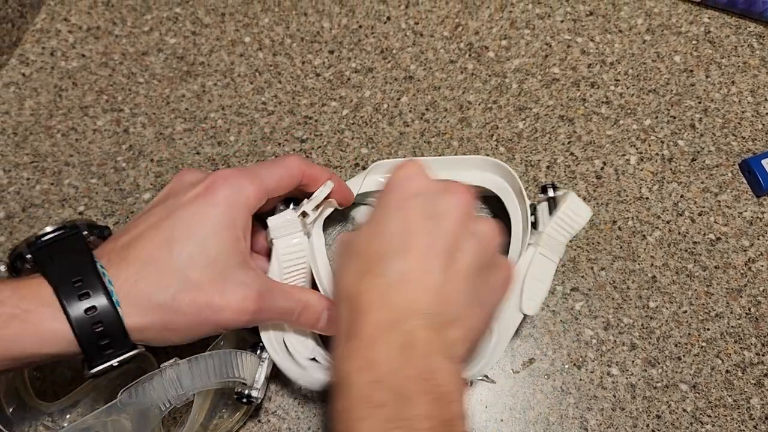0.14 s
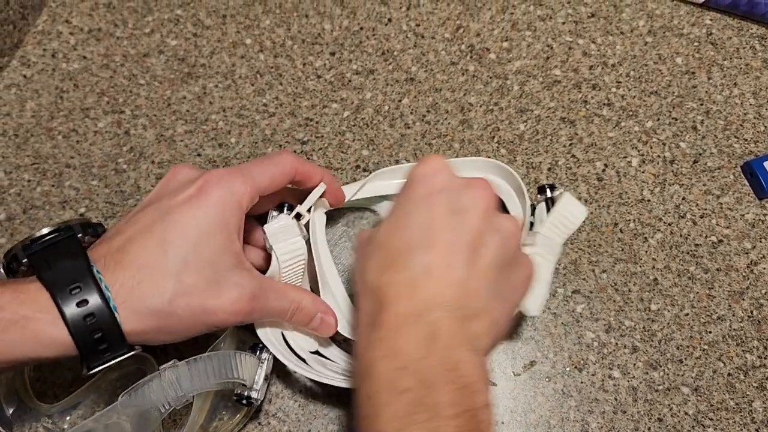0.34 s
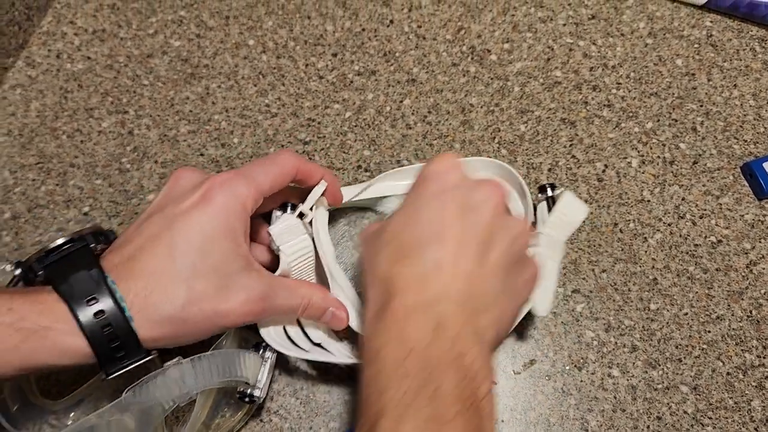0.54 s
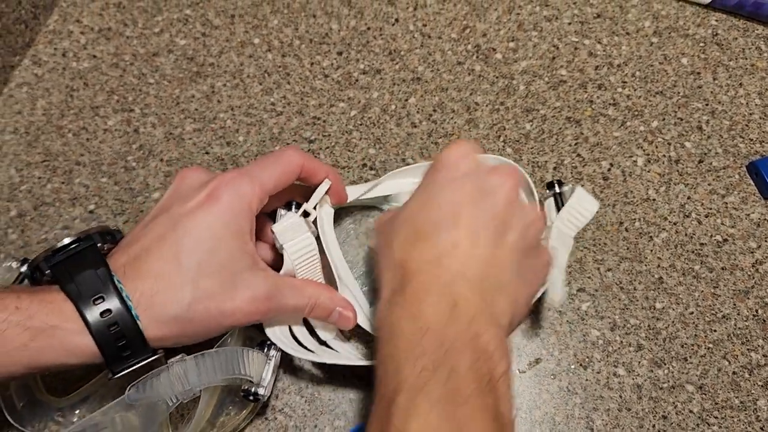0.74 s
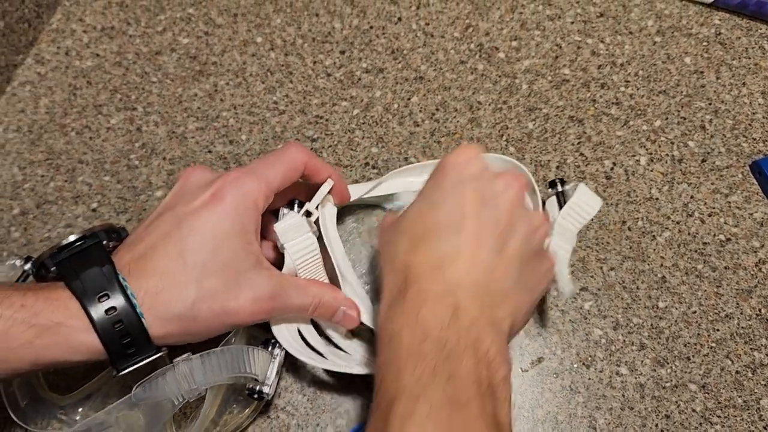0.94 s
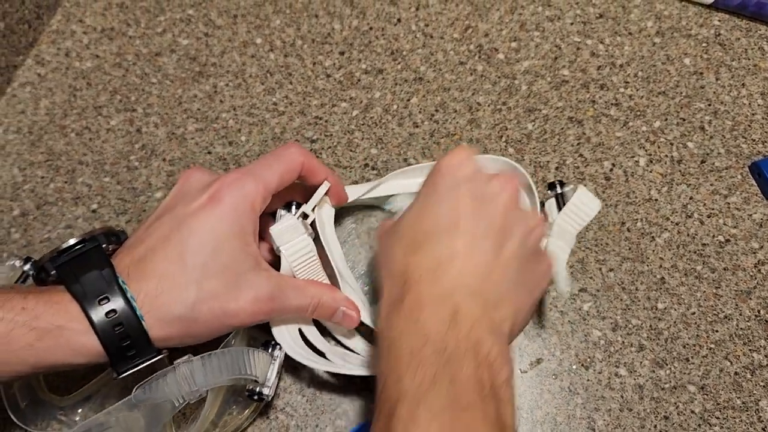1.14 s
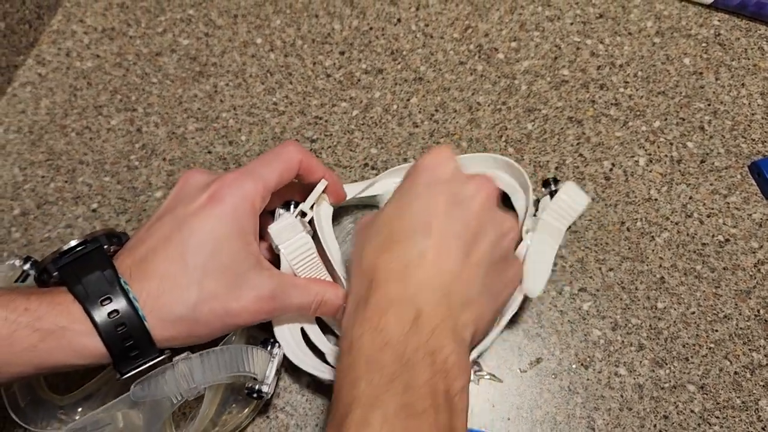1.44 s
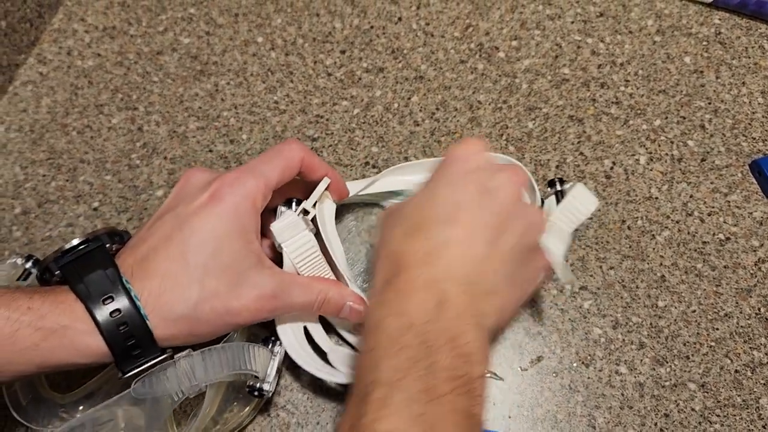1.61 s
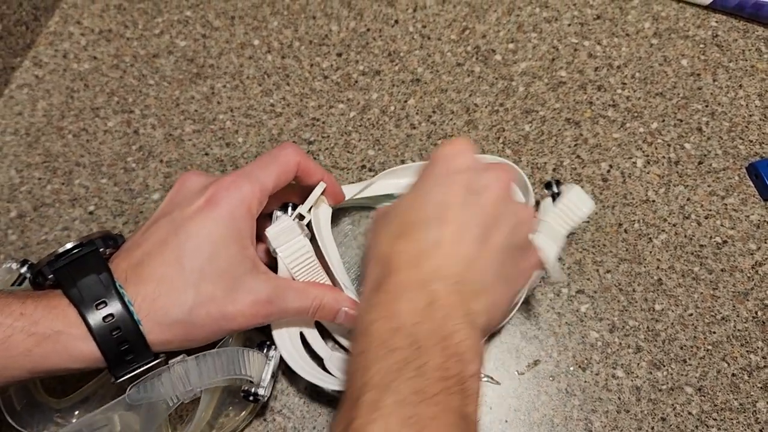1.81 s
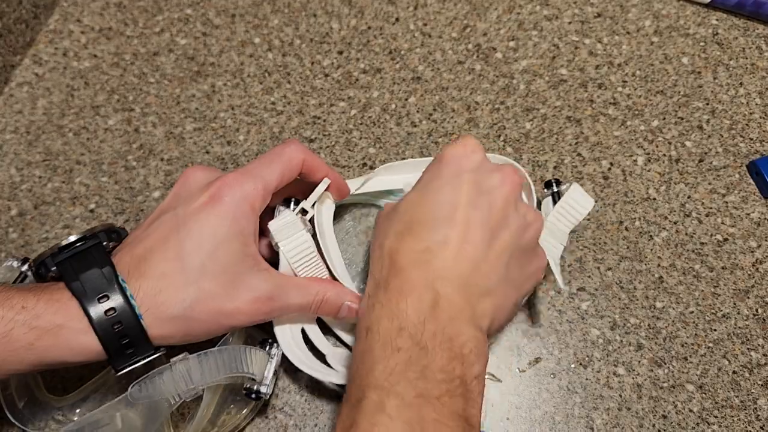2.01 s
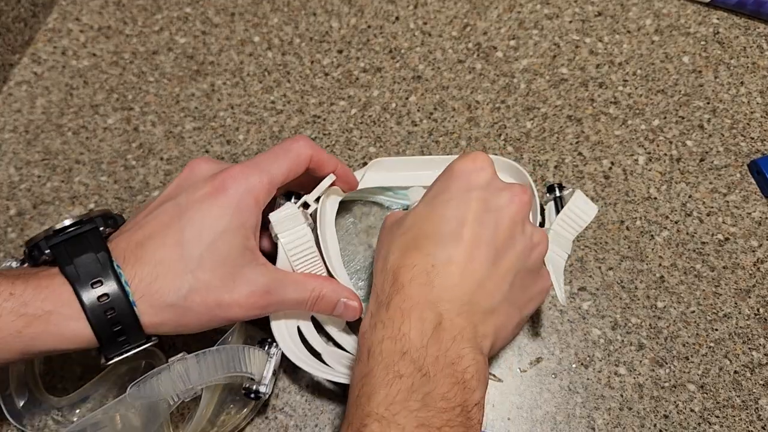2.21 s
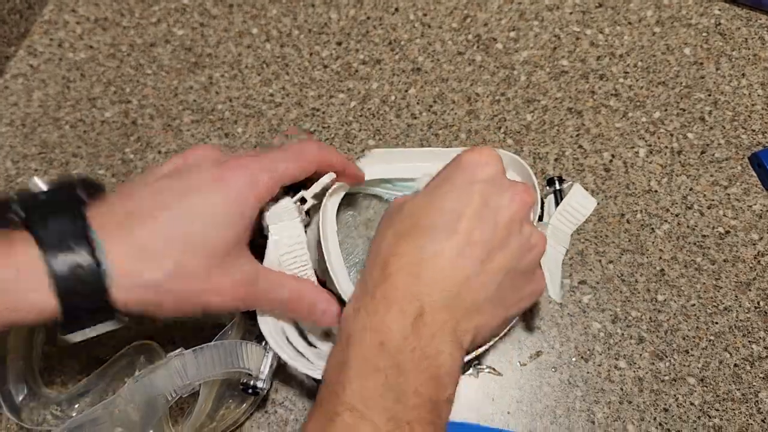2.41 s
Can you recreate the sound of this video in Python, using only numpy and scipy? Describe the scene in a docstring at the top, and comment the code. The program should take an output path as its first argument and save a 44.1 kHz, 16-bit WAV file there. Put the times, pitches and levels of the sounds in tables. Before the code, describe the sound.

Close in a small kitchen, fast scuffing finger strokes on a mask lens mix with dull counter bumps, low shudder, wet squelches and sticky ticks, fading after about two seconds to faint handling knocks.

```python
"""A kitchen counter in a small room: a fingertip scrubs gritty paste around the glass of a diving mask.
Random grains make the hiss and the scuffing strokes; short ringing hollows make the wet squelches.
Coloured noise bursts make paste snaps and frame clacks; decaying modes make the dull thumps and shudder.
A left and right microphone hear it, with sparse room reflections and a quiet background."""
import sys
import numpy as np
from scipy import signal
from scipy.fft import rfft, irfft
from scipy.io import wavfile
from scipy.ndimage import uniform_filter1d

SR = 44100
rng = np.random.default_rng(int(sys.argv[2]) if len(sys.argv) > 2 else 0)


def transcribe(signal):
    """Save signal, clipped to [-1, 1], as a 16-bit WAV file at the path in sys.argv[1]."""
    frames = np.atleast_2d(signal).T
    limited = np.clip(frames, -1, 1)
    pcm = np.round(limited * 32767).astype(np.int16)
    wavfile.write(sys.argv[1], SR, pcm)


N = 112454  # length in samples

# All table levels are relative: the trims below and the microphones still act on them.
# rubbing hiss: time_s, level_db
HISS_LEVEL = [(0, -50.5), (.2, -50.5), (.26, -54), (.9, -56.5), (1.25, -56.5), (1.88, -57), (2.0, -66),
              (2.2, -69.5), (2.33, -64), (2.55, -63.5)]
# tone of the grit in the paste: pitch_hz, level_db
PASTE_TONE = [(100, 5.5), (600, 1.5), (900, 2), (1500, 7), (2200, 5), (3800, -0.5), (5000, 3), (6600, -2.5),
              (8000, -1.5), (9300, -16.5), (13000, -13), (16000, -15)]
# moments when the finger slows and turns round: time_s
TURNS = [0.271, 0.438, 0.628, 0.819, 1.026, 1.212, 1.392, 1.595, 1.782]
# the finger speeds up and scuffs the glass: middle_s, level_db, resonance_hz
STROKES = [(0.021, -59, 1480), (0.091, -48.5, 2130), (0.147, -59, 1110), (0.202, -52.5, 2070),
           (0.38, -68, 1940), (0.506, -53.5, 2070), (0.551, -58.5, 3140), (0.674, -56.5, 1730),
           (0.748, -69, 2470), (0.873, -57.5, 4900), (0.913, -59, 2610), (1.089, -63.5, 4400),
           (1.139, -57.5, 3700), (1.437, -56, 1640), (1.507, -60.5, 2820), (1.667, -58.5, 1950),
           (1.726, -58.5, 2500)]
# low shudder of the dragged mask: time_s, level_db
SHUDDER_LEVEL = [(0, -39), (.3, -35.5), (.9, -40), (1.25, -44), (1.55, -38), (1.85, -42), (2.02, -55.5),
                 (2.3, -63.5), (2.55, -49.5)]
# modes of mask and counter: pitch_hz, level_db, t60_s, polarity_sign
BODY_MODES = [(60.7, -7, .17, 1), (73.4, 1, 0.15, 1), (149.4, 3.5, 0.077, 1), (166.23, -2.5, 0.26, 1),
              (201.2, -9, 0.22, 1), (238, -8, 0.047, -1), (297.5, 1, 0.063, -1), (406.1, -10.5, 0.081, -1)]
# wet squelches under the finger: start_s, level_db, resonance_hz
SQUELCHES = [(0.059, -42.5, 1640), (0.0806, -39.5, 5020), (0.1644, -49.5, 4430), (0.2158, -45.5, 1340),
             (0.338, -52, 2780), (0.3612, -44, 2860), (0.393, -53, 1460), (0.7262, -49.5, 3070),
             (0.92, -50.5, 2420), (0.9497, -43.5, 4300), (1.0357, -52.5, 5900), (1.1208, -53.5, 2980),
             (1.164, -52.5, 1540), (1.325, -47, 5620), (1.4086, -55, 1460), (1.5, -51, 2950),
             (1.5628, -49, 1460), (1.6053, -46.5, 1440), (1.709, -43, 3080), (1.749, -48.5, 1530),
             (1.8023, -41, 1386), (2.1896, -64.5, 4600), (2.331, -59, 1400)]
# tone of the splash in a squelch: pitch_hz, level_db
SPLASH_TONE = [(300, 14), (1200, 6), (2500, -1.5), (5000, 5.5), (8000, -13), (10000, -74), (16000, -16)]
# paste film snaps: start_s, level_db
SNAPS = [(0.0976, -44.5), (0.109, -45.5), (0.1277, -45), (0.217, -71), (0.571, -46), (0.7548, -38.5),
         (0.861, -53), (0.9499, -37), (1.1537, -43.5), (1.3509, -47), (1.538, -52), (1.801, -61),
         (1.874, -52), (2.0193, -54)]
# tone of a snap: pitch_hz, level_db
SNAP_TONE = [(400, -35), (1400, 12.5), (2800, -13), (4200, 11), (5200, 3.5), (7500, 8.5), (9500, 0),
             (13000, 4.5), (16000, 2)]
# plastic frame clacks: start_s, level_db
CLACKS = [(0.113, -24.5), (0.127, -29.5), (0.335, -30.5), (0.503, -41), (0.675, -43.5), (2.023, -46),
          (2.38, -40), (2.409, -46)]
# tone of a clack: pitch_hz, level_db
CLACK_TONE = [(60, -42), (350, -2), (950, 5.5), (1450, 3), (2300, -5.5), (4000, -11.5), (7500, -21.5),
              (10000, -60)]
# the mask bumps the counter: start_s, level_db, contact_softness_ms, two_lowest_modes_extra_db
THUMPS = [(0.1149,-10.5,.08,5), (.136,-15.5,0.24,10.5), (0.198,-17,0.69,1), (.335,-15,.08,-6),
          (.376,-20,0.59,-3.5), (0.505,-18,0.4,-7), (.544,-21,0.84,5.5), (.587,-28.5,0.57,-2),
          (.676,-16.5,0.34,-2), (0.752,-27.5,0.46,7), (.776,-26.5,0.73,-22), (.868,-28,0.54,-25),
          (.981,-27.5,1.52,-3), (1.08,-27.5,0.56,-31), (1.187,-23.5,1.33,-2.5), (1.292,-27.5,0.31,3),
          (1.366,-26.5,0.35,22), (1.484,-26,0.17,3), (1.521,-26.5,0.79,-9.5), (1.563,-29,1.36,-0.5),
          (1.669,-26.5,1.08,-14.5), (1.727,-22,1.3,-3.5), (1.909,-23,1.96,-7.5), (2.071,-25.5,2.8,-12.5),
          (2.413,-34.5,2.4,-5), (2.479,-37,0.7,-15)]
# decay of the kitchen: pitch_hz, t60_s
ROOM_DECAY = [(100, .28), (500, .26), (2000, .24), (6000, .27), (15000, .23)]
# tone of the quiet background: pitch_hz, level_db
BACKGROUND_TONE = [(25, 1), (120, 2.5), (500, -23), (1400, -30), (3000, -85), (5300, -41), (7800, -31),
                   (9400, -82), (16000, -46)]
# left microphone over right: pitch_hz, level_db
LEFT_OVER_RIGHT = [(500, 8), (1200, 4), (2500, -1), (4500, -1), (7000, 5), (13000, 7.5)]
# phase lead of the left microphone: pitch_hz, lead_rad
LEFT_LEAD = [(500, 0.98), (1200, 1.3), (2000, 0.73), (5000, 0), (8000, 1.45)]

LIKENESS = 0.36  # shared power of the two channels, 0 to 1
BACKGROUND_DB = -62
HISS_DB, GRAINS_PER_S, GRAIN_SPREAD_DB = -6.5, 3400, 3
TURN_S, HISS_DIP_DB, SHUDDER_DIP_DB = 0.013, 7, 7.5
SLIPS_PER_S, STUTTER_DB = 150, 6
STROKE_HALF_S, SCUFF_GRAINS_PER_S, SCUFF_SPREAD_DB = 0.039, 700, 1
SCUFF_RING_DB, SCUFF_CYCLES = -3.5, 1.1
SHUDDER_DB, GRIP_DETUNE = 2, .05  # detune is the largest fraction of each mode's pitch
SQUELCH_DB, SQUELCH_SPREAD_S, SQUELCH_CYCLES = -2, 0.0064, 2
SPLASH_DB, SPLASH_S = -12.5, 0.0057
SNAP_DB, SNAP_DECAY_S = -2, 0.0025
CLACK_DB, CLACK_DECAY_S = -4.5, 0.0033
ROOM_DB, BODY_ROOM_DB, SQUELCH_ROOM_DB = -7, -25, -13
LOW_CUT_HZ, BAND_LIMIT_HZ = 60.3, 15950


def amp(db):
    """Decibels to gain."""
    return 10 ** (np.asarray(db) / 20)


def unit(x):
    """Scales to rms 1."""
    return x / np.sqrt(np.mean(x ** 2) + 1e-20)


def loudest(x):
    """Scales so that the loudest 3 milliseconds or so have rms 1."""
    power = np.atleast_2d(x ** 2).mean(0)
    return x / np.sqrt(uniform_filter1d(power, size=128).max())


def read(points, hz):
    """Reads a table on a log-frequency axis."""
    f, value = np.transpose(points)
    return np.interp(np.log(hz + 1), np.log(f + 1), value)


def level(curve):
    """A dB curve over time as a gain per sample."""
    return amp(np.interp(np.arange(N) / SR, *np.transpose(curve)))


def add(mix, s, sound, pan_db=0):
    """Places a sound in time and between the microphones; a positive pan favours the left."""
    part = mix[:, max(round(s * SR), 0):][:, :sound.shape[-1]]
    panned = sound * amp([[pan_db / 2], [-pan_db / 2]])
    part += panned[:, :part.shape[1]]


def colour(x, spectrum):
    """Causal minimum-phase filter with the given spectrum."""
    hz = abs(np.fft.fftfreq(2048, 1 / SR))
    log_gain = np.log(amp(read(spectrum, hz)))
    taps = np.fft.ifft(np.exp(np.conj(signal.hilbert(log_gain)))).real
    return signal.oaconvolve(x, taps[None, :len(taps) // 2], axes=1)[:, :x.shape[1]]


def pair(z, likeness):
    """Mixes three unrelated signals into two partly alike channels."""
    shared = np.clip(likeness, 0, 1)
    return np.sqrt(shared) * z[0] + np.sqrt(1 - shared) * z[1:]


def background():
    """Quiet steady noise, shaped in tone and partly shared by the channels."""
    noise = pair(rng.standard_normal((3, N)), likeness=0.44)
    return amp(BACKGROUND_DB) * unit(colour(noise, BACKGROUND_TONE))


def grains(size, per_s=GRAINS_PER_S, spread_db=GRAIN_SPREAD_DB):
    """Dense tiny clicks of uneven strength and random sign, in two channels."""
    polarity = rng.choice([-1, 1], (3, size))
    strength = amp(spread_db * np.minimum(rng.exponential(1, (3, size)), 5))
    struck = rng.random((3, size)) < per_s / SR
    return unit(pair(polarity * strength * struck, LIKENESS))


def sliding(dip_db):
    """Gain of the friction: it sinks each time the finger slows to turn round."""
    t = np.arange(N) / SR
    slowing = sum(np.exp(-((t - s) / TURN_S) ** 2) for s in TURNS)
    return amp(-dip_db * slowing)


def stutter():
    """Skin sticks and slips: a quick uneven flutter of the friction."""
    slip_s = np.cumsum(rng.uniform(.3, 1.7, 1000)) / SLIPS_PER_S
    flutter = np.interp(np.arange(N) / SR, slip_s, rng.uniform(-1, 1, len(slip_s)))
    return unit(amp(STUTTER_DB * flutter))


def rubbing():
    """Grit rolls between skin and glass: a grainy hiss that sinks at each turn."""
    hiss = unit(colour(grains(N), PASTE_TONE))
    return amp(HISS_DB) * level(HISS_LEVEL) * sliding(HISS_DIP_DB) * hiss


def cavity(x, hz, cycles, size=512):
    """The hollow between fingertip and glass rings as a sine that dies within a few cycles."""
    turns = hz * np.arange(size) / SR
    ring = np.exp(-turns / cycles) * np.sin(2 * np.pi * turns)
    return signal.fftconvolve(x, ring[None], axes=1)[:, :x.shape[1]]


def strokes():
    """Each quick stroke is a swell of sparser grit that rings the hollow under the finger."""
    out, t = np.zeros((2, N)), np.arange(N) / SR
    grit = unit(colour(grains(N, SCUFF_GRAINS_PER_S, SCUFF_SPREAD_DB), PASTE_TONE))
    for s, db, hz in STROKES:
        near = abs(t - s) < STROKE_HALF_S
        ring = unit(cavity(grit[:, near], hz, SCUFF_CYCLES))
        scuff = unit(grit[:, near] + amp(SCUFF_RING_DB) * ring)
        swell = np.cos(np.pi / 2 * (t[near] - s) / STROKE_HALF_S) ** 4
        out[:, near] += amp(db) * swell * scuff
    return out


def body(soft_ms, low_db=0, size=16384):
    """The modes of mask and counter, rung by one soft push; the grip shifts each a little."""
    t = np.arange(size) / SR
    ring = np.zeros(size)
    for k, (hz, db, t60, sign) in enumerate(BODY_MODES):
        gripped_hz = hz * (1 + GRIP_DETUNE * rng.uniform(-1, 1))
        decay = amp(db + low_db * (k < 2) - 60 * t / t60)
        ring += np.sign(sign) * decay * np.sin(2 * np.pi * gripped_hz * t)
    u = 1000 * t / max(soft_ms, .1)
    push = u * np.exp(-u)
    return loudest(signal.fftconvolve(ring, push)[:size])


def shudder():
    """The dragging finger excites the modes of mask and counter with steady noise."""
    out = np.zeros((2, N))
    ring = body(soft_ms=1.82, low_db=-3.5)
    drag = unit(signal.fftconvolve(rng.standard_normal(N + len(ring) - 1), ring, "valid"))
    gain = amp(SHUDDER_DB) * level(SHUDDER_LEVEL) * sliding(SHUDDER_DIP_DB)
    add(out, 0, gain * drag, pan_db=1.0)
    return out


def burst(decay_s, spectrum, size=2048):
    """A short coloured crack of decaying noise."""
    t = np.arange(size) / SR
    noise = pair(rng.standard_normal((3, size)), LIKENESS)
    return loudest(colour(noise * np.exp(-t / decay_s), spectrum))


def squelches(size=2048):
    """Small air pockets open in the paste: quick clicks ring the hollow, with a splash."""
    out, t = np.zeros((2, N)), np.arange(size) / SR
    for s, db, hz in SQUELCHES:
        clicks = grains(size) * np.exp(-t / SQUELCH_SPREAD_S)
        pop = loudest(cavity(clicks, hz, SQUELCH_CYCLES))
        wet = loudest(pop + amp(SPLASH_DB) * burst(SPLASH_S, SPLASH_TONE))
        add(out, s + 0.001065, amp(db + SQUELCH_DB) * wet, pan_db=-3.0)
    return out


def snaps():
    """The paste film breaks with a bright tick of noise."""
    out = np.zeros((2, N))
    for s, db in SNAPS:
        add(out, s, amp(db + SNAP_DB) * burst(SNAP_DECAY_S, SNAP_TONE))
    return out


def clacks():
    """Short hollow knocks of the plastic frame, as coloured noise bursts."""
    out = np.zeros((2, N))
    for s, db in CLACKS:
        add(out, s, amp(db + CLACK_DB) * burst(CLACK_DECAY_S, CLACK_TONE), pan_db=1.0)
    return out


def thumps():
    """The mask bumps the counter and rings the modes of both; softer contact dulls them."""
    out = np.zeros((2, N))
    for s, db, soft_ms, low_db in THUMPS:
        add(out, s + 0.00091, amp(db) * body(soft_ms, low_db), pan_db=1.37)
    return out


def microphones(x):
    """The pair differs in level by pitch, and the left leads in phase where its table is above zero."""
    hz = np.fft.rfftfreq(N, 1 / SR)
    half_db = read(LEFT_OVER_RIGHT, hz) / 2
    left = amp(half_db)
    right = amp(-half_db) * np.exp(-1j * read(LEFT_LEAD, hz))
    return irfft(rfft(x) * np.array([left, right]), N)


def room(x):
    """Sparse reflections of the kitchen from 4 ms on, each band dying at its own speed."""
    size = SR // 2
    taps = rng.standard_normal((2, size)) * (rng.random((2, size)) < 4000 / SR)
    taps[:, :round(.004 * SR)] = 0
    hz, t, bands = signal.stft(taps, SR, nperseg=256)
    decay = amp(-60 * t / read(ROOM_DECAY, hz)[:, None])
    tail = signal.istft(bands * decay, SR, nperseg=256)[1]
    tail /= np.linalg.norm(tail, axis=1, keepdims=True)
    return signal.fftconvolve(x, tail, axes=1)[:, :N]


def scene():
    """Finger, paste and mask at the microphones, with the room's answer and a quiet background."""
    friction = stutter() * (rubbing() + strokes())
    low = shudder() + thumps()
    pops = microphones(squelches())
    high = microphones(friction + snaps() + clacks())
    to_room = amp(SQUELCH_ROOM_DB) * pops + amp(ROOM_DB) * high + amp(BODY_ROOM_DB) * low
    return low + high + pops + room(to_room) + background()


def record(dry):
    """The recorder's low cut and band limit."""
    low_cut = signal.butter(3, LOW_CUT_HZ, "high", fs=SR, output="sos")
    thin = signal.sosfilt(low_cut, dry)
    band_limit = signal.firwin(255, BAND_LIMIT_HZ, window=("kaiser", 9), fs=SR)
    return signal.oaconvolve(thin, band_limit[None], "same")


dry = scene()
out = record(dry)
transcribe(out)
```